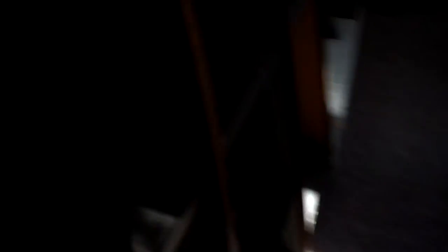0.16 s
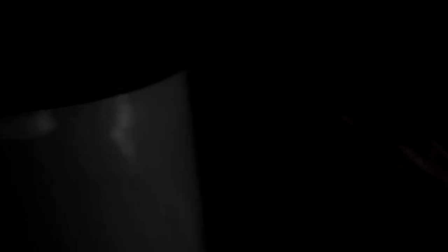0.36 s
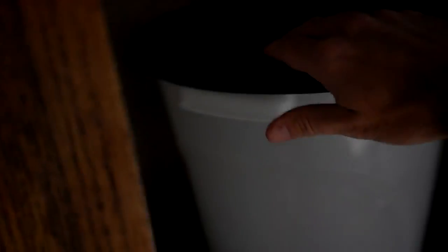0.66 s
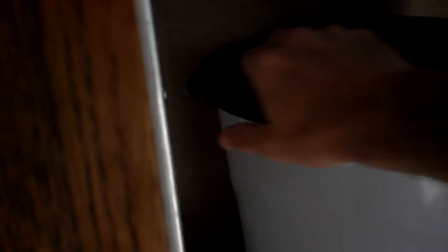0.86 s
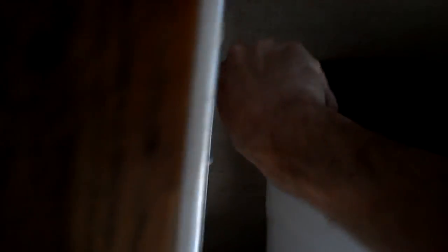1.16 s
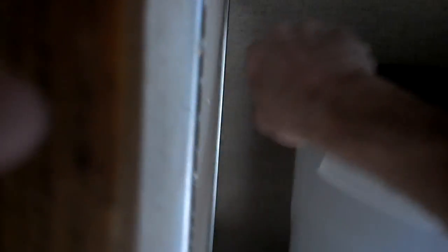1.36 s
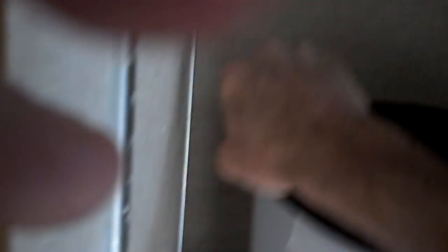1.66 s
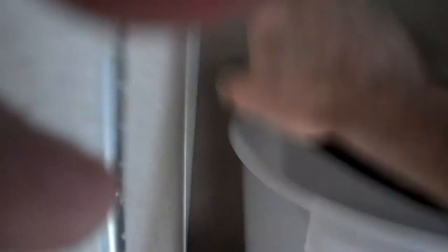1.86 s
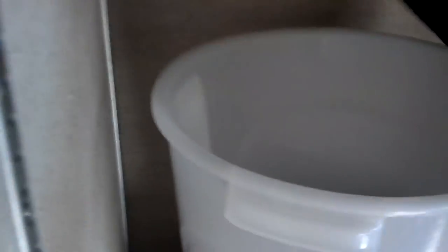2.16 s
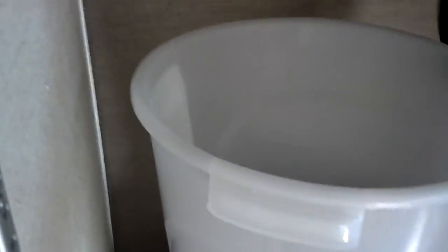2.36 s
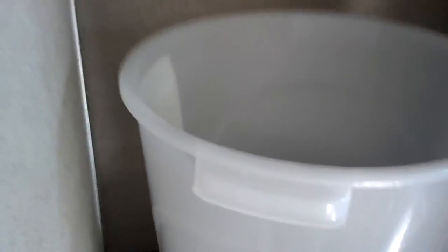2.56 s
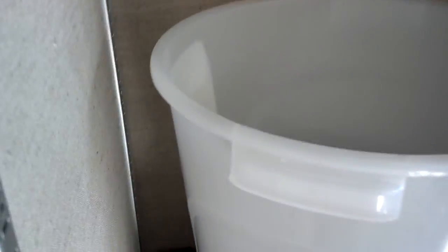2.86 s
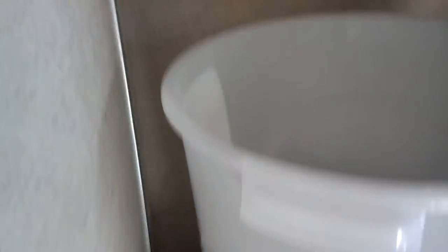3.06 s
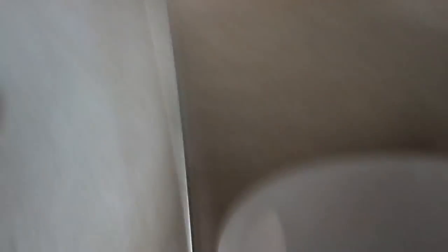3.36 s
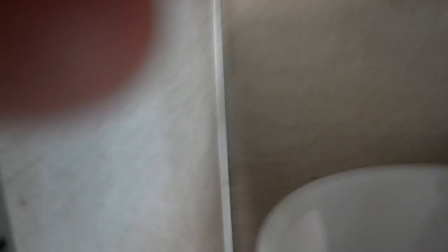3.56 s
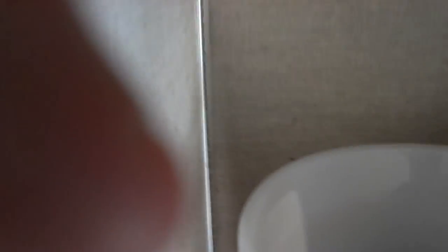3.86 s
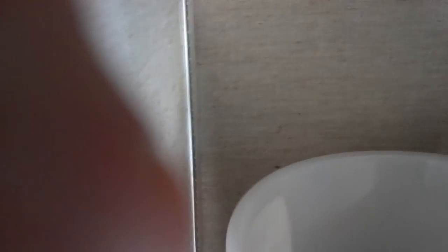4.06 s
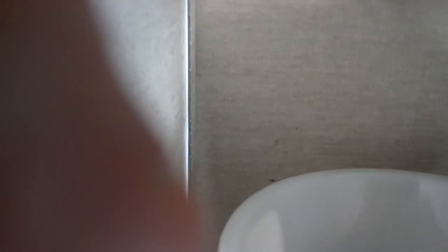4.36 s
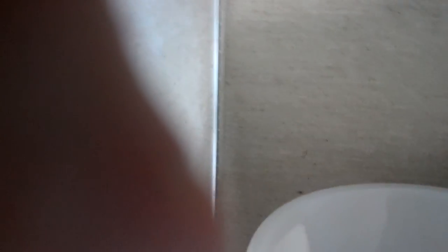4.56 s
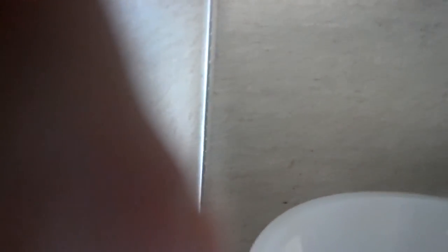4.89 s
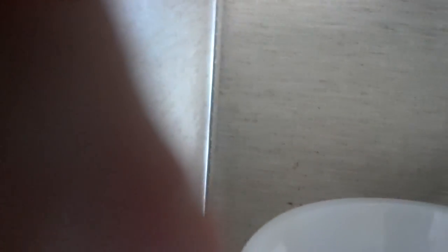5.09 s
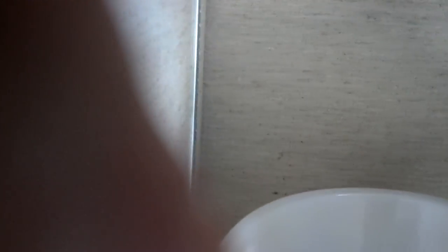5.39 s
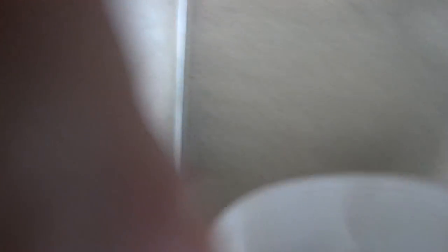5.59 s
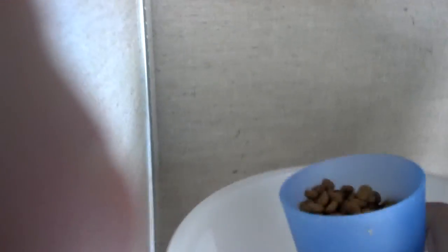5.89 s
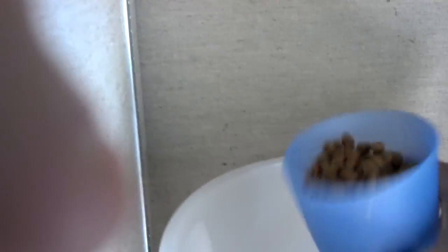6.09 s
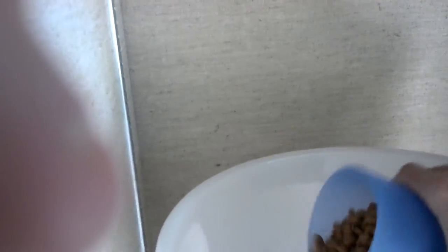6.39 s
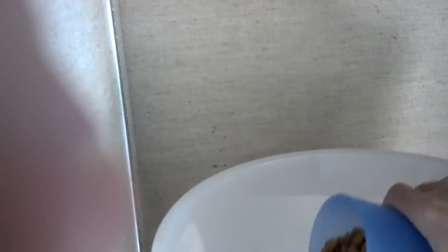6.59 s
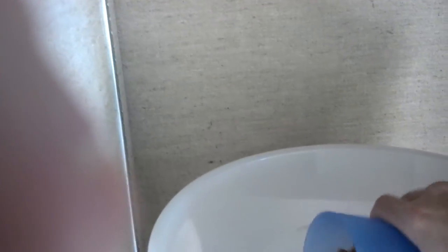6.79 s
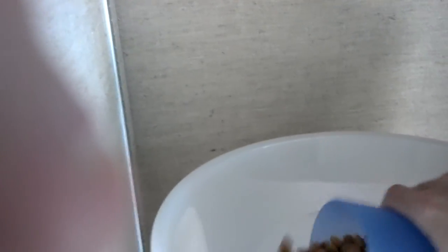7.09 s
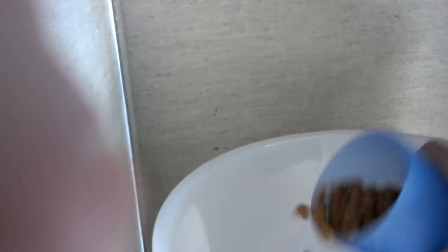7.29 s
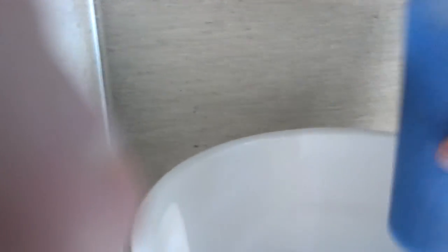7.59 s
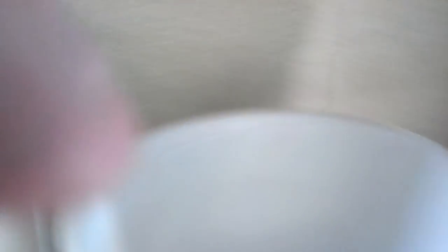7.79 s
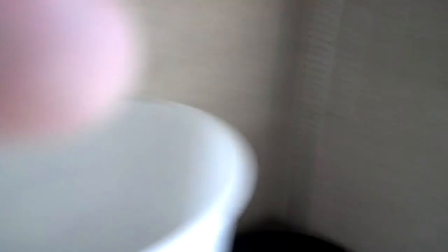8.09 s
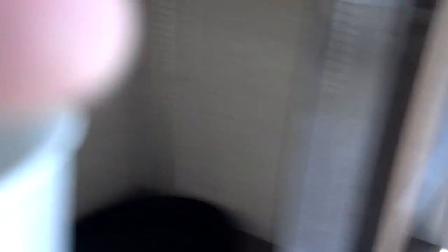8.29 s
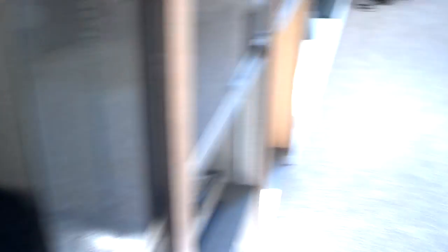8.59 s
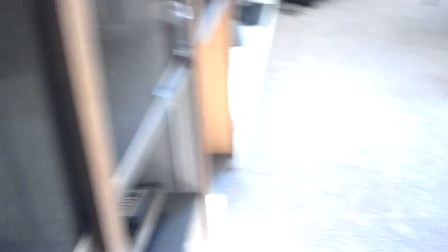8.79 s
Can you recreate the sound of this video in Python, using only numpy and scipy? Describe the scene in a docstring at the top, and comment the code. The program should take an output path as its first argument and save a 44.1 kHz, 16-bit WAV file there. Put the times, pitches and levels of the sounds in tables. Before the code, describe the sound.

Hollow plastic knocks and a sharp lid snap, followed by dry pellets crunching, rattling and spilling from a scooping cup.

```python
"""Scooping dry pet food

A plastic bucket is dragged from a cupboard, bumping its floor, and the lid comes off with a crack.
A plastic cup knocks about inside, digs through the pellets and is shaken so that they rattle and spill.
Impacts and friction excite the damped modes of lid, cup and bucket; each pellet adds a brief click.
Something metallic rings softly. Beneath it all lie a faint room hiss and a refrigerator hum."""
import sys
import numpy as np
from scipy import signal
from scipy.fft import rfft, irfft, next_fast_len
from scipy.io import wavfile
from scipy.ndimage import uniform_filter1d

SR = 44100
rng = np.random.default_rng(int(sys.argv[2]) if len(sys.argv) > 2 else 0)


def int16_out(signal):
    """Quantize to a 16-bit WAV file."""
    q = np.round(np.clip(np.atleast_2d(signal).T, -1, 1) * 32767)
    wavfile.write(sys.argv[1], SR, q.astype(np.int16))


N = 394496

# spectrum of the room hiss: frequency_hz, level_db
HISS_SPECTRUM = [(30, -19.5), (70, -21), (110, -4.5), (250, -3), (600, -4), (1300, -9.5), (2200, -13),
                 (4000, -20.5), (8000, -27.5), (12000, -30), (16500, -17.5)]
# hiss and hum swell and sink together: time_s, level_db
ROOM_ENVELOPE = [(0, -57.5), (.4, -53), (1.4, -55), (1.8, -52.5), (2.1, -68), (2.6, -70.5), (3.4, -54),
                 (4.25, -68), (5.0, -54.5), (6.3, -53), (7.6, -53), (7.95, -62), (8.3, -60), (8.45, -52),
                 (8.7, -53.5), (8.95, -54.5)]
# blows on bucket, lid and cup: start_s, plastic_db, wall_db, tick_db, rattle_t60_s, centre_hz
BLOWS = [(0.319, -40.5, -62, -50, 0.4, 695), (0.646, -41, -43, -25, 0.18, 900),
         (0.886, -43.5, -45, -23.5, 0.13, 1240), (1.072, -56, -43, -37, 0.056, 750),
         (1.1135, -22, -26.5, -11.5, 0.058, 960), (1.508, -45.5, -58.5, -32, 0.12, 690),
         (1.629, -48, -47.5, -51, 0.3, 860), (1.7395, -40, -39, -7, 0.089, 1150),
         (1.7805, -13, -29.5, 7.5, 0.039, 1432), (1.789, -30.5, -50, -30, 0.39, 983),
         (2.239, -35, -39.5, -16.5, 0.1, 1022), (2.611, -33, -42.5, -18, 0.13, 990),
         (2.723, -25, -27, -0.5, 0.08, 1060), (2.769, -31, -49, -66, 0.21, 980),
         (2.866, -54, -24, -43, 0.1, 743), (2.903, -17, -23, -27, 0.065, 750),
         (2.928, -27, -37, -36, 0.1, 1000), (2.939, -23.5, -24, -34, 0.058, 900),
         (2.984, -32.5, -34, -17, 0.072, 654), (3.017, -39, -38.5, -27.5, 0.18, 800),
         (3.0706, -24, -27, -54, 0.087, 720), (3.107, -21, -27.5, -19, 0.054, 730),
         (3.1372, -21.5, -29, -21, 0.076, 1000), (3.175, -28, -31.5, -34, 0.065, 750),
         (3.314, -27.5, -34.5, -53, 0.062, 633), (3.377, -29.5, -36.5, -55, 0.095, 610),
         (3.405, -38.5, -38, -50, 0.072, 696), (3.477, -41, -42, -31, 0.079, 660),
         (3.627, -45, -35.5, -34, 0.071, 656), (3.8059, -28, -33, -7, 0.1, 1520),
         (3.884, -24, -45, -3.5, 0.069, 1300), (3.934, -20, -29.5, -5.5, 0.096, 1230),
         (4.137, -41.5, -37, -19.5, 0.1, 1230), (4.211, -39.5, -40, -19.5, 0.087, 1180),
         (4.391, -25, -42, -14.5, 0.054, 1350), (4.437, -26.5, -46.5, -16, 0.2, 1380),
         (4.782, -30.5, -51, -8, 0.083, 1500), (4.798, -32.5, -49.5, -8, 0.072, 1510),
         (5.095, -41.5, -36.5, -12.5, 0.19, 1220), (5.622, -37, -65, -1.5, 0.028, 1340),
         (5.84, -36.5, -56, -24, 0.28, 1330), (5.949, -33.5, -39, -30, 0.065, 1350),
         (6.044, -36, -54, -18.5, 0.077, 1340), (6.565, -35.5, -38, -31, 0.08, 1330),
         (6.677, -26.5, -51, -30, 0.1, 1340), (6.736, -34.5, -61, -22, 0.056, 1400),
         (6.813, -42, -56, -22, 0.11, 1850), (7.147, -37, -66.5, -25, 0.055, 1340),
         (7.184, -35.5, -64, -37, 0.33, 1410), (7.201, -43, -55, -29, 0.18, 1400),
         (7.254, -26, -52, -2.5, 0.056, 1430), (7.276, -30.5, -69, -36, 0.069, 1390),
         (7.327, -33.5, -64, -38, 0.075, 1400), (7.348, -32, -53, -44, 0.33, 1400),
         (7.506, -43, -59, -40, 0.044, 1380), (7.688, -51, -55, -20.5, 0.2, 1250)]
# single pellets drop and skip: start_s, tick_db, rattle_t60_s
PELLET_DROPS = [(3.828, -3.5, .04), (3.835, -6, .04), (4.368, -10, 0.099), (4.74, -23, 0.03),
                (4.841, -11.5, 0.05), (5.033, -22.5, 0.2), (5.178, -10.5, 0.095), (5.468, -21, 0.057),
                (5.4858, -5.5, 0.055), (5.504, -6.5, 0.048), (5.579, -7, 0.029), (5.609, -31, 0.036),
                (5.815, -6, 0.04), (6.106, -14, 0.15), (6.24, -7, 0.07), (6.342, -34, 0.088),
                (6.4444, -8, 0.063), (6.478, -7.5, 0.15), (6.551, -11, 0.034), (6.608, -11, 0.028),
                (6.855, -23, 0.042), (6.906, -14, 0.099), (6.968, -23, 0.034), (7.094, -2, 0.041),
                (7.458, -14, 0.12), (7.517, -14.5, .08), (7.549, -8.5, 0.085), (7.601, -7.5, 0.08),
                (7.633, -8, 0.082), (7.773, -19.5, 0.087)]
# modes of the hard plastic of cup and lid: pitch_hz, level_db, t60_s
PLASTIC_MODES = [(664, -20.5, 0.028), (781, -2.5, 0.031), (940, 2, 0.016), (1100, -2, 0.014),
                 (1250, 1, 0.015), (1340, 2.5, 0.0083), (1500, 3.5, 0.014), (1750, 9, 0.0051),
                 (2001, 0, 0.032), (2170, 3.5, 0.013), (2500, -8.5, 0.074)]
# modes of the bucket wall and its air: pitch_hz, level_db, t60_s
WALL_MODES = [(141, -4.5, 0.06), (203, -7.5, 0.1), (255, -2, 0.092), (332.7, 3.5, 0.032), (438, 4.5, 0.044),
              (498, 1.5, 0.094), (534.5, 4.5, 0.027)]
# hollow ring of the air in the open bucket, once the lid is off: pitch_hz, level_db, t60_s
OPEN_BUCKET_MODES = [(656, -13.5, 0.19), (700, -18.5, 0.27), (948.5, -11.5, 0.094)]
# spectrum of ticks and pellet clicks: frequency_hz, level_db
CLICK_SPECTRUM = [(300, -49.5), (1500, -11), (2600, -1), (4300, 1.5), (6000, -1), (7500, -8.5),
                  (10000, -8.5), (13000, -12), (16500, -4.5)]
# hands slide bucket, lid and cup: start_s, length_s, plastic_db, wall_db, scratch_db
SLIDE_STROKES = [(.45, 0.31, -59.5, -66, -62), (.872, .02, -52, -44, -54.5), (.92, 0.12, -48, -48, -50.5),
                 (1.04, 0.078, -42, -35, -50), (1.18, 0.21, -52, -50, -63.5),
                 (1.345, 0.022, -45.5, -47.5, -51), (1.57, 0.047, -56.5, -41, -81),
                 (1.65, 0.075, -57, -40, -60), (1.738, 0.0095, -44.5, -42, -43.5),
                 (2.8, 0.055, -47.5, -42, -56.5), (3.22, 0.16, -54, -48.5, -76),
                 (3.47, 0.3, -75, -56.5, -59), (3.66, 0.06, -50, -47.5, -53), (3.75, .03, -52, -49, -50),
                 (3.785, 0.022, -50, -40, -34), (3.92, 0.12, -51, -56, -59),
                 (4.14, 0.1, -49.5, -53.5, -55.5), (8.72, 0.036, -65, -63, -57.5)]
# spectrum of skin rubbing on plastic: frequency_hz, level_db
SCRATCH_SPECTRUM = [(300, -35), (1500, -5.5), (2800, 1), (4300, 2), (7000, -7.5), (10000, -8),
                    (16500, -6.5)]
# the bucket bumps the cupboard floor: start_s, level_db
FLOOR_BUMPS = [(0.646, -31.5), (0.881, -25), (0.973, -31.5), (1.061, -32), (1.115, -22), (1.341, -40),
               (1.645, -31), (2.243, -49), (2.615, -43), (2.865, -21.5), (2.937, -37), (3.072, -51),
               (3.136, -38), (4.402, -33), (4.58, -33), (5.282, -38), (5.733, -25.5)]
# modes of the cupboard floor: pitch_hz, level_db, t60_s
FLOOR_MODES = [(104, -1.5, 0.19), (121.4, 3, 0.38), (165, -1, 0.15)]
# the cup is pushed through the heap: start_s, length_s, cup_db, wall_db, clicks_db
DIG_STROKES = [(4.36, 0.078, -24.5, -28.5, -28.5), (4.47, 0.058, -29, -31, -34.5),
               (4.53, 0.059, -27, -25.5, -27), (4.6, 0.073, -32, -28.5, -26),
               (4.685, 0.059, -27, -33, -27.5), (4.78, 0.046, -27.5, -44, -35.5),
               (5.1, 0.0067, -41, -37.5, -39.5), (5.23, 0.072, -21.5, -29, -28),
               (5.37, 0.33, -32, -49, -41), (5.68, 0.1, -29.5, -47, -32), (5.77, 0.083, -29.5, -33, -35.5),
               (5.945, 0.01, -31.5, -30, -42)]
# the cup is shaken and tipped: start_s, length_s, cup_db, wall_db, clicks_db
SHAKE_STROKES = [(6.11, 0.069, -55.5, -54.5, -39.5), (6.24, 0.015, -45, -74, -32.5),
                 (6.362, 0.0092, -39, -53, -25), (6.395, 0.012, -49.5, -68, -36.5),
                 (6.48, 0.042, -41, -53, -27.5), (6.57, 0.078, -56, -58, -43.5),
                 (6.68, 0.073, -35, -42, -37.5), (6.8, 0.086, -55, -51.5, -44),
                 (6.935, 0.047, -45, -44.5, -38), (7.01, 0.042, -55, -51, -44.5),
                 (7.06, 0.044, -43.5, -50, -28.5), (7.15, 0.0048, -32.5, -58, -40),
                 (7.19, 0.12, -31, -52, -38), (7.335, 0.071, -36, -61, -40), (7.44, 0.13, -54, -55.5, -46),
                 (7.58, 0.06, -53, -66.5, -49.5)]
# resonance of the air in the cup: pitch_hz, level_db, t60_s
CUP_AIR_MODES = [(1318, 0, 0.021)]
# touches on something hollow and metallic: start_s, level_db
METAL_TOUCHES = [(5.744, -38.5), (5.83, -28.5), (5.956, -31)]
# modes of that metal object: pitch_hz, level_db, t60_s
METAL_MODES = [(311, -7, .9), (359.5, -8, .9), (516, 5, 0.25)]
# phase lag that turns the inverted right channel's bass towards the left: frequency_hz, phase_rad
RIGHT_BASS_PHASE = [(50, 0.98), (120, 1.1), (200, 0.57), (400, 1.56), (800, 0.078), (1400, 0.024)]
# dip in the right channel's low midrange: frequency_hz, gain_db
RIGHT_RESPONSE = [(100, 0), (300, -2.5), (700, -2.5), (1400, 0)]


def amp(db):
    """Amplitude ratio of a level in decibels."""
    return 10 ** (np.asarray(db) / 20)


def unit_rms(x):
    """Normalisation to an rms of 1."""
    return x / np.sqrt(np.mean(x ** 2) + 1e-20)


def butterworth(x, order, hz, kind="low"):
    """Filtering with a maximally flat passband."""
    return signal.sosfilt(signal.butter(order, hz, kind, fs=SR, output="sos"), x + 1e-18)


def at_hz(points, hz):
    """Interpolation on a logarithmic frequency axis."""
    frequencies, values = np.transpose(points)
    return np.interp(np.log(hz + 1), np.log(frequencies), values)


def colour(x, spectrum):
    """Minimum-phase filtering: the spectrum is shaped and nothing sounds before its cause."""
    log_gain = np.log(amp(at_hz(spectrum, np.linspace(0, SR / 2, 2049))))
    cepstrum = irfft(log_gain)
    cepstrum[1:2048] *= 2
    cepstrum[2049:] = 0
    pulse = irfft(np.exp(rfft(cepstrum)))
    return signal.oaconvolve(x, pulse / np.sqrt(np.sum(pulse ** 2)))[:N]


def drift(corner_hz):
    """Low-passed noise: a slow random fluctuation with a standard deviation of 1."""
    pole = np.exp(-80 * np.pi * corner_hz / SR)
    noise = rng.standard_normal(N // 40 + 2002)
    slow = signal.lfilter([1], [1, -2 * pole, pole * pole], noise)[2000:]
    return np.interp(np.arange(N) / 40, np.arange(len(slow)), slow / slow.std())


def resonate(force, modes, alternate=True):
    """Modal superposition: a force is convolved with damped sines, of alternating sign or in phase."""
    t = np.arange(int(max(t60 for _, _, t60 in modes) * SR)) / SR
    response = sum((-1) ** (k * alternate) * amp(db - 60 * t / t60) * np.sin(2 * np.pi * hz * t)
                   for k, (hz, db, t60) in enumerate(modes))
    return signal.oaconvolve(force, response)[:len(force)]


def around(modes, centre_hz, fall_db):
    """The point of contact weights the modes: they lose fall_db per squared octave from a centre."""
    return [(hz, db - min(fall_db * np.log2(hz / centre_hz) ** 2, 24), t60) for hz, db, t60 in modes]


def room_tone(hum_hz=217, hum_db=-8.5):
    """Broadband hiss and a wavering refrigerator tone, plus low hiss uncorrelated between the sides."""
    level_db = np.interp(np.arange(N) / SR, *np.transpose(ROOM_ENVELOPE))
    gain = amp(level_db + drift(29))
    phase = 2 * np.pi * np.cumsum(hum_hz + 2.5 * drift(3)) / SR
    hum = amp(hum_db) * unit_rms(np.sin(phase))
    side_hiss = amp(-17) * unit_rms(butterworth(rng.standard_normal((2, N)), 1, [150, 700], "band"))
    hiss = colour(rng.standard_normal(N), HISS_SPECTRUM)
    return gain * (hiss + hum), gain * side_hiss


def impacts(lid_off_s=2.0, drop_centre_hz=1850):
    """Impact excitation: each blow or falling pellet is an impulse and a dying rattle that ring modes."""
    plastic, wall, ticks = np.zeros((3, N + SR))
    age = np.arange(SR // 4) / SR
    drops = [(s, db - 50, db - 54, db, t60, drop_centre_hz) for s, db, t60 in PELLET_DROPS]
    for start_s, plastic_db, wall_db, tick_db, t60, centre_hz in BLOWS + drops:
        onset = round(start_s * SR)
        span = slice(onset, onset + len(age))
        rattle = 0.11 * rng.standard_normal(len(age)) * amp(-60 * age / t60)
        rattle[0] = min(1.7, 0.061 / t60)   # long rattles start softly
        fall_db = 26.5 * max(1, t60 / .14)   # and keep to few modes
        struck = [(hz, db + rng.normal(0, 1.2), decay_s)
                  for hz, db, decay_s in around(PLASTIC_MODES, centre_hz, fall_db)]
        plastic[span] += amp(plastic_db) * resonate(rattle, struck, alternate=False)
        boom = around(WALL_MODES, 0.26 * centre_hz, fall_db=5.5)
        if start_s > lid_off_s:
            boom += OPEN_BUCKET_MODES
        wall[span] += amp(wall_db) * resonate(rattle, boom)
        rattle[0] *= .6   # the tick is more rattle than click
        burst_db = 4.1 * rng.standard_normal(len(age) // 50 + 1)
        bursts = unit_rms(amp(np.repeat(burst_db, 50)[:len(age)]))   # about a millisecond each
        tilt = rng.uniform(-0.75, 0.52)   # each tick is brighter or duller
        ticks[span] += amp(tick_db) * signal.lfilter([1, tilt], [1], rattle * np.r_[1, bursts[1:]])
    ticks = butterworth(ticks, 1, 10000)   # the ticks lose their top treble
    plastic = butterworth(plastic, 2, 550, "high")   # the blows on plastic carry no deep bass
    return (plastic + wall)[:N] + colour(ticks[:N], CLICK_SPECTRUM)


def contacts(per_s, spread_db, clump_db):
    """A Poisson train of unequal impulses, clumped by a fluctuating level; rms 1."""
    onsets = np.flatnonzero(rng.random(N) < per_s / SR)
    sizes = amp(spread_db * np.minimum(rng.exponential(1, len(onsets)), 3))
    force = np.zeros(N)
    force[onsets] = sizes * np.sign(rng.random(len(onsets)) - .5)
    return unit_rms(force * amp(clump_db * drift(32)))


def strokes(rows, rise_db_per_s, fall_db_per_s):
    """Envelopes, one per level column: exponential rise up to each start, a hold, exponential decay."""
    t = np.arange(0, N, 64) / SR
    start, length, *levels_db = np.array(rows).T[:, :, None]
    rise_db = rise_db_per_s * np.maximum(start - t, 0)
    fall_db = fall_db_per_s * np.maximum(t - start - length, 0)
    shape_db = -np.minimum(rise_db + fall_db, 150)
    return [np.interp(np.arange(N) / SR, t, amp(db + shape_db).max(axis=0)) for db in levels_db]


def friction(gains, force, plastic_modes, wall_modes, contact_noise):
    """Forced vibration: one stream of contacts drives plastic and wall, heard with its own noise."""
    plastic_gain, wall_gain, noise_gain = gains
    plastic = plastic_gain * unit_rms(resonate(force, plastic_modes))
    wall = wall_gain * unit_rms(resonate(force, wall_modes))
    return plastic + wall + noise_gain * contact_noise


def sliding():
    """Sliding friction: hands move bucket, lid and cup, and many tiny contacts make a scratch."""
    force = contacts(per_s=3600, spread_db=-6, clump_db=3.5)
    gains = strokes(SLIDE_STROKES, rise_db_per_s=380, fall_db_per_s=229)
    plastic_modes = around(PLASTIC_MODES, 930, fall_db=9.5)
    wall_modes = around(WALL_MODES, 200, fall_db=5)
    return friction(gains, force, plastic_modes, wall_modes, colour(force, SCRATCH_SPECTRUM))


def floor_bumps(contact_s=0.0086):
    """A long contact excites low frequencies: the bucket's weight thumps the cupboard floor."""
    start_s, level_db = np.transpose(FLOOR_BUMPS)
    impulses = np.zeros(N)
    impulses[(start_s * SR).astype(int)] = amp(level_db)
    push = np.hanning(int(contact_s * SR))
    return resonate(signal.fftconvolve(impulses, push / push.sum())[:N], FLOOR_MODES)


def tumbles(per_s=110, t60_s=0.018):
    """Small avalanches: handfuls of pellets land at once, so a gain jumps and relaxes to 1."""
    jumps = (rng.random(N) < per_s / SR) * rng.uniform(0.1, 1, N) * amp(-6)
    settling = signal.lfilter([1], [1, -amp(-60 / (t60_s * SR))], jumps)
    return 1 + uniform_filter1d(settling, size=180)


def pellet_clicks(force, pitch_count=16, t60_s=0.0018):
    """Each pellet is a damped oscillator that rings briefly at a randomly assigned pitch."""
    pitch_index = rng.integers(0, pitch_count, N)
    radius = amp(-60 / (t60_s * SR))
    rings = np.zeros(N)
    for k, hz in enumerate(np.linspace(2400, 15800, pitch_count)):
        angle = 2 * np.pi * hz / SR
        feedback = [1, -2 * radius * np.cos(angle), radius ** 2]
        rings += signal.lfilter([0, np.sin(angle)], feedback, force * (pitch_index == k) + 1e-18)
    return colour(unit_rms(rings), CLICK_SPECTRUM)


def scooping(cup_out_s=5.6, brighten_s=0.55):
    """Granular flow: pellets, dug and shaken, collide and drive the cup, its air and the bucket wall."""
    heap = contacts(per_s=8000, spread_db=0, clump_db=2)
    lone_clacks = amp(-7.5) * contacts(per_s=400, spread_db=4, clump_db=4.5)
    force = unit_rms((heap + lone_clacks) * tumbles())
    bright = pellet_clicks(force + 0.66 * contacts(per_s=2500, spread_db=4, clump_db=4))
    dull = butterworth(bright, 1, 7200)   # deep in the bucket, until the cup comes over the rim
    lifted = np.clip((np.arange(N) / SR - cup_out_s) / brighten_s, 0, 1)
    clicks = dull + (bright - dull) * lifted
    digging = strokes(DIG_STROKES, rise_db_per_s=684, fall_db_per_s=208)
    shaking = strokes(SHAKE_STROKES, rise_db_per_s=831, fall_db_per_s=510)
    cup_modes = around(PLASTIC_MODES, 1520, fall_db=34) + CUP_AIR_MODES
    return friction(np.maximum(digging, shaking), force, cup_modes, WALL_MODES, clicks)


def metal_ring():
    """Free vibration: lightly damped metal rings on after each soft touch."""
    force = np.zeros(N)
    for start_s, level_db in METAL_TOUCHES:
        force[round(start_s * SR)] = amp(level_db)
    return resonate(force, METAL_MODES)


def reverberation(x, bass_t60_s=0.42, wall_cutoff_hz=750):
    """Repeated reflection: five feedback delays a side, losing treble to the walls on every round."""
    size = next_fast_len(N + SR)
    log_delay = -2j * np.pi * np.arange(size // 2 + 1) / size
    pole = np.exp(-2 * np.pi * wall_cutoff_hz / SR)
    reflection = (1 - pole) / (1 - pole * np.exp(log_delay))
    response = np.zeros((2, len(log_delay)), complex)
    for k, lag in enumerate((rng.uniform(0.021, .045, 10) * SR).astype(int)):
        loop = amp(-60 * lag / SR / bass_t60_s) * reflection * np.exp(log_delay * lag)
        response[k % 2] += (-1) ** (k // 2) * loop / (1 - loop)
    return irfft(response * rfft(x, size), size)[:, :N]


def right_channel(x, lag_samples=16):
    """Phase difference: the right side is inverted and late, its bass turned partly back in phase."""
    size = next_fast_len(N + 4096)
    hz = np.arange(size // 2 + 1) * SR / size
    phase = np.pi - 2 * np.pi * hz * lag_samples / SR - at_hz(RIGHT_BASS_PHASE, hz)
    response = amp(at_hz(RIGHT_RESPONSE, hz)) * np.exp(1j * phase)
    return irfft(rfft(x, size) * response, size)[:N]


def scene():
    """Superposition: both sides share the direct sound; each adds its own echoes and low hiss."""
    background, side_hiss = room_tone()
    direct = impacts() + sliding() + floor_bumps() + scooping() + metal_ring()
    echo = reverberation(direct)
    cupboard_boom = amp(-17.5) * butterworth(echo[0], 1, [800, 1080], "band")
    shared = direct + background + cupboard_boom
    low_echo = butterworth(echo, 2, 900)
    room_echo = amp(-23) * low_echo + amp(-26) * (echo - low_echo)
    return np.array([shared, right_channel(shared)]) + room_echo + side_hiss


def record(dry, stopband_hz=16300):
    """Clipping and band limiting: peaks are flattened, then deep bass and top treble are removed."""
    clipped = np.clip(dry, -.85, .85)
    bass_cut = butterworth(clipped, 3, 80, "high")
    return signal.sosfilt(signal.cheby2(14, 70, stopband_hz, fs=SR, output="sos"), bass_cut)


dry = scene()
out = record(dry)
int16_out(out)
```